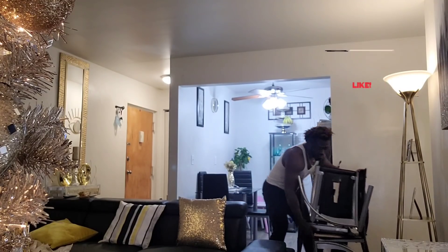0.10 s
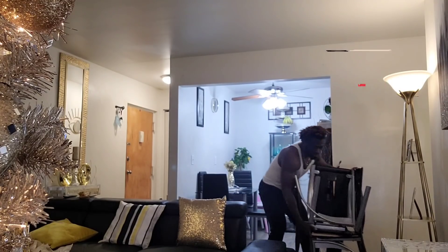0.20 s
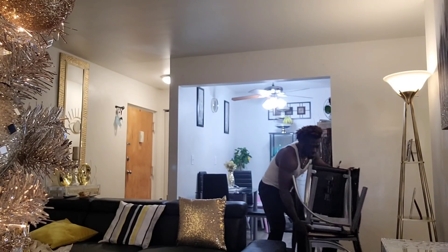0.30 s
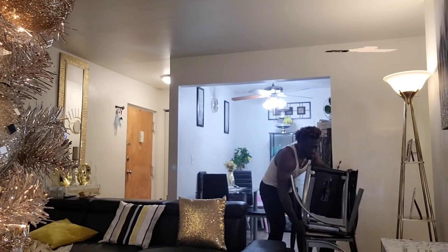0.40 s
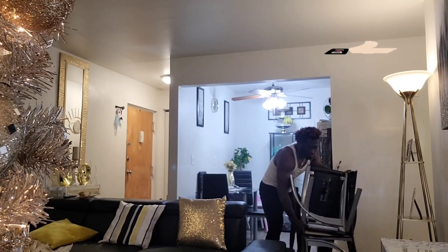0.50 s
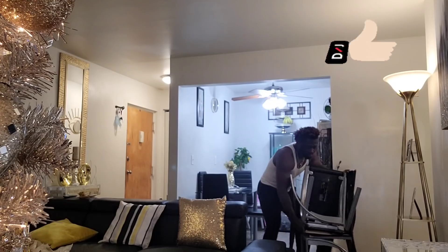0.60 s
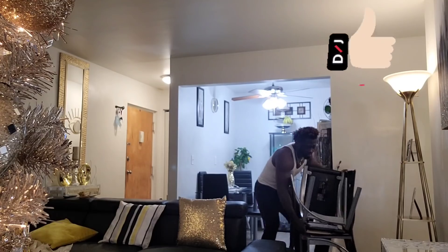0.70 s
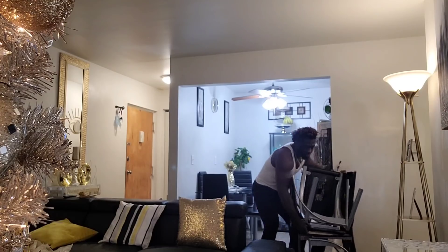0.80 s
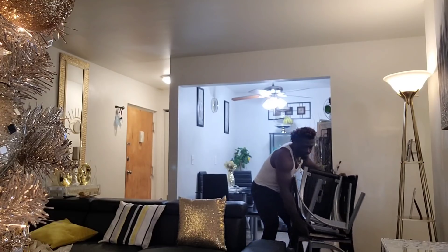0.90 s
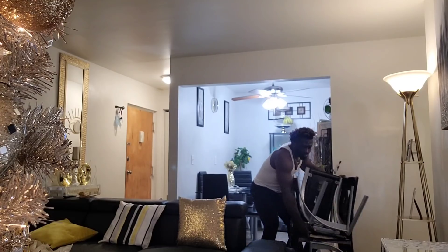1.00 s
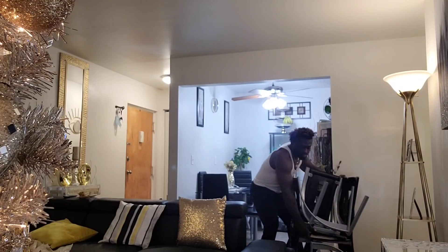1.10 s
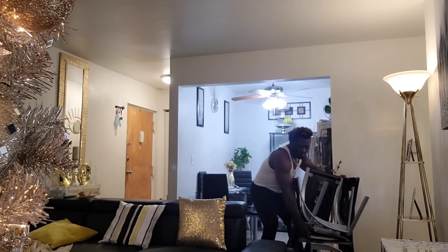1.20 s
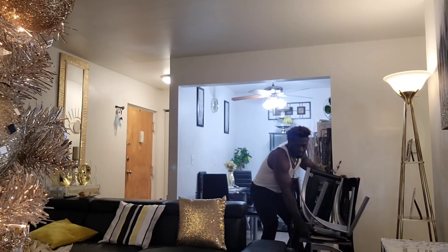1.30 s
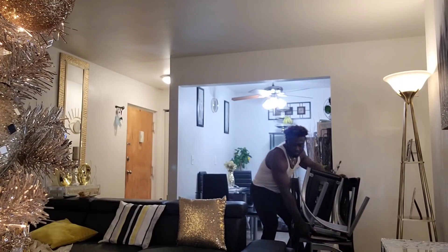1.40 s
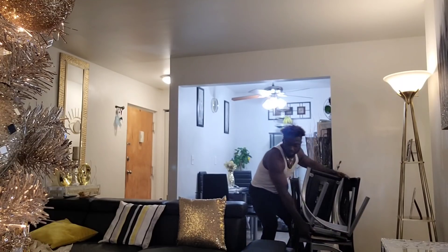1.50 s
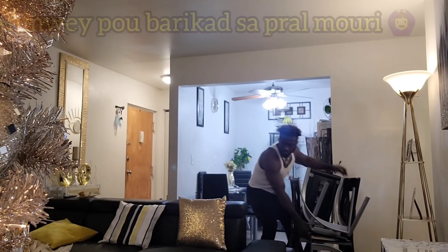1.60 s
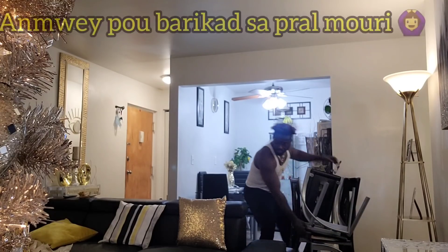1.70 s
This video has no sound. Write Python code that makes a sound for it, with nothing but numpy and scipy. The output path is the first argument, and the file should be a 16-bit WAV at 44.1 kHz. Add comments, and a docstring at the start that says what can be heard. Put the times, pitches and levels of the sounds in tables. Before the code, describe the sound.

A metal-framed chair clunks loudly onto a stack, clatters and scrapes, then settles with lighter knocks

```python
"""A metal-framed chair is settled onto a stack in a living room, a little to the right; a fan hums throughout.
After light contact it lands with a loud clunk, its tubes scrape down the frame below, it seats with a second
clunk and is nudged home with lighter knocks, and a loose tube rings on. The seats rub in between.
Knocks are decaying noise bands plus struck sine modes; scrapes are random slips through a resonator;
rubbing and air are coloured noise; the fan is wavering sines."""
import sys
import numpy as np
from scipy import signal
from scipy.io import wavfile
from scipy.ndimage import uniform_filter1d

SR = 44100
rng = np.random.default_rng(int(sys.argv[2]) if len(sys.argv) > 2 else 0)


def transcribe(u):
    """Save the signal u as a 16-bit wav file named by the first command-line argument.

    u: samples, shape (n,) or (channels, n), limited to [-1, 1]; the rate is SR.
    q: integer samples, one column per channel.
    """
    v = np.clip(np.atleast_2d(u).T, -1, 1)
    q = np.round(v * 32767).astype(np.int16)
    wavfile.write(sys.argv[1], SR, q)


N = 74970
TIME = np.arange(N) / SR
EDGES_HZ = 25 * 2 ** (np.arange(29) / 3)  # third octaves
CENTRES_HZ = np.sqrt(EDGES_HZ[1:] * EDGES_HZ[:-1])

# frame meets frame: start_s, rise_s, modes_db, favoured_mode_hz, body_db, knock_db, clack_db, clank_db, tick_db
KNOCKS = [ (0.001, 0.0017, -42.5, 214, -33.5, -43, -48, -44.5, -83),
          (0.153, 0.0038, -59, 327, -42.5, -40.5, -48, -80, -56),
          (0.228, 0.0078, -16.5, 203, -18, -23, -21.5, -19.5, -37.5),
          (0.241, 0.0029, -33.5, 406, -22.5, -23, -21, -43, -55),
          (0.395, 0.0023, -55, 250, -50, -36.5, -42, -59.5, -62.5),
          (0.409, 0.0024, -57.5, 400, -45.5, -34, -40.5, -47, -46),
          (0.420, 0.0074, -40, 403, -35, -24, -29, -32, -36),
          (0.431, 0.012, -31.5, 503, -38, -32.5, -30.5, -24.5, -61),
          (0.473, 0.0037, -24.5, 360, -24.5, -29, -28.5, -27.5, -45),
          (0.581, 0.00145, -58, 390, -84, -65, -66, -57, -60),
          (0.6794, .002, -38.5, 420, -33.5, -30, -36, -46, -51),
          (0.6908, 0.0011, -53, 400, -49, -43, -66, -46, -58),
          (0.709, 0.0031, -59, 400, -54, -71, -46, -60, -60),
          (0.774, 0.0077, -70, 400, -67, -67, -62, -51.5, -68),
          (0.8263, .001, -66, 400, -44, -63, -48.5, -47.5, -52),
          (0.857, 0.004, -45, 280, -38, -40, -48.5, -57.5, -56),
          (0.919, 0.014, -55.5, 307, -40.5, -44.5, -58, -60, -70),
          (1.031, .006, -52, 300, -48, -43, -52, -46.5, -74),
          (1.052, 0.0044, -43, 219, -34, -50, -44.5, -45.5, -76),
          (1.080, 0.0088, -40, 222, -36.5, -41, -38.5, -36.5, -46.5),
          (1.105, 0.012, -50, 402, -51, -40, -48, -46, -65),
          (1.253, 0.0045, -59.5, 300, -51.5, -53, -95, -62, -72),
          (1.563, 0.0018, -78.5, 400, -68, -81, -74.5, -74, -82),
          (1.683, 0.0029, -75.5, 400, -68, -67, -84.5, -74, -74)]


def amp(db):
    """Decibels to gain."""
    return 10 ** (np.asarray(db) / 20)


def at_hz(points, hz):
    """Read a table on a log-frequency axis."""
    table_hz, values = np.transpose(points)
    return np.interp(np.log(hz), np.log(table_hz), values)


def pan(db):
    """Left and right gains: db down on the left, db up on the right."""
    return amp([[-db], [db]])


def dying(t60_s):
    """Exponential decay from the first sample, 60 dB in t60_s."""
    return amp(-60 * TIME / t60_s)


def convolve(x, response):
    """Play a signal through a response."""
    return signal.fftconvolve(np.atleast_2d(x), response, axes=-1)[:, :N]


def drift(knots_per_s):
    """Random line through 400 knots of spread 1; holds the last one once they run out."""
    knots = rng.standard_normal(400)
    return np.interp(TIME * knots_per_s, np.arange(len(knots)), knots)


def stereo_noise(hz):
    """White noise, as alike in both channels as the room makes it at this pitch."""
    # pitch_hz, left_right_correlation
    likeness = [(60, 0.9), (170, 1), (300, 0.52), (600, .2), (1500, 0), (12000, 0.072)]
    alike = np.clip(at_hz(likeness, hz), -.99, .99)
    mid, side = rng.standard_normal((2, N))
    return np.sqrt((1 + alike) / 2) * mid + np.sqrt((1 - alike) / 2) * side * [[1], [-1]]


def band(x, index):
    """One third-octave band; unit white noise comes out at 0 dB per octave."""
    lo_hz, hi_hz = EDGES_HZ[index], EDGES_HZ[index + 1]
    sos = signal.butter(2, [lo_hz, hi_hz], "band", fs=SR, output="sos")
    return signal.sosfilt(sos, x + 1e-18) * np.sqrt(SR / 6 / (hi_hz - lo_hz))


def knock_db(hz):
    """Level of every knock at one pitch."""
    # pitch_hz of body, knock, clack, clank, tick
    knock_hz = [250, 900, 2300, 4600, 11000]
    return np.array([np.interp(np.log(hz), np.log(knock_hz), row[4:]) for row in KNOCKS])


def blows(db):
    """One impulse for each knock, halfway through its rise."""
    rows, out = np.array(KNOCKS), np.zeros(N)
    strike_s = rows[:, 0] + rows[:, 1] / 2
    out[(strike_s * SR).astype(int)] = amp(db)
    return out


def mode(hz, t60_s, lag_rad):
    """A sine that swells briefly and dies, lagging in the right channel."""
    rise_s = 0.0018
    envelope = dying(t60_s) * (1 - np.exp(-TIME / rise_s))
    return envelope * np.sin(2 * np.pi * hz * TIME - np.array([[0], [lag_rad]]))


def damped(start_s, hz, db, t60_s, rise_s):
    """One quickly dying resonance struck at start_s."""
    age_s = np.maximum(TIME - start_s, 0)
    envelope = np.interp(age_s, TIME, dying(t60_s)) * (1 - np.exp(-age_s / rise_s))
    return amp(db) * envelope * np.sin(2 * np.pi * hz * age_s)


def fan():
    """Slightly wavering fan and mains tones over a soft rush of air."""
    # tones before trim and pan: pitch_hz, level_db (rms)
    hum = [(64.6, -74), (118.4, -73), (193.8, -60), (328.4, -67), (376.8, -73.5), (495.3, -80), (1357, -80)]
    # room floor before pan: pitch_hz, level_db_per_octave
    air_floor = [(25, -91), (40, -80.5), (60, -74.5), (110, -77.5), (200, -63), (350, -58.5), (600, -67.5),
                 (1000, -70), (1400, -73), (1900, -94), (5000, -85.5), (8000, -80), (15000, -87)]
    trim_db, waver, waver_knots_per_s, pan_db = 0.5, .1, 4.2, 1.9
    tones = np.zeros(N)
    for hz, db in hum:
        level = amp(db + trim_db) * np.sqrt(2) * (1 + waver * drift(waver_knots_per_s))
        tones += level * np.sin(2 * np.pi * (hz * TIME + rng.random()))
    air = np.zeros((2, N))
    for k, hz in enumerate(CENTRES_HZ):
        air += band(stereo_noise(hz), index=k) * amp(at_hz(air_floor, hz))
    return (tones + air) * pan(pan_db)


def rubbing():
    """Grainy hiss of the seats sliding over each other: coloured noise with a flickering level."""
    # strength as the chair is handled, before colour: time_s, level_db
    rub = [(0, -45), (.12, -57), (.22, -50.5), (.38, -50.5), (.55, -49.5), (.62, -56.5), (.68, -49),
           (.76, -55.5), (.82, -60), (.88, -54.5), (.94, -63.5), (1.01, -51), (1.08, -53.5), (1.2, -67),
           (1.3, -65.5), (1.46, -78), (1.7, -87)]
    # added to the strength: pitch_hz, level_db_per_octave
    colour = [(100, -18.5), (300, -2), (1000, -2.5), (2500, -3.5), (5000, -5), (7500, -1.5), (10000, -8),
              (15000, -1.5)]
    flicker_db, flicker_knots_per_s = 1, 120
    level = amp(np.interp(TIME, *np.transpose(rub)) + flicker_db * drift(flicker_knots_per_s))
    out = np.zeros((2, N))
    for k, hz in enumerate(CENTRES_HZ):
        out += band(stereo_noise(hz) * level, index=k) * amp(at_hz(colour, hz))
    return out


def tube_rings():
    """A loose tube is left ringing, in clusters of close partials that beat."""
    # clusters: centre_hz, half_spread_hz, level_db (peak of one partial before division by root count), t60_s
    clusters = [(3470, 125, -40.5, .4), (1940, 80, -50, .25)]
    struck_s = 1.09
    places = np.linspace(-1, 1, 9)
    out = np.zeros((2, N))
    for hz, spread_hz, db, t60_s in clusters:
        decay = np.interp(TIME - struck_s, TIME, dying(t60_s), left=0)
        for place in places:
            partial_hz = hz + spread_hz * (place + .1 * rng.standard_normal())
            phase_rad = rng.uniform(0, 2 * np.pi, (2, 1))
            partial = np.sin(2 * np.pi * partial_hz * TIME + phase_rad)
            out += amp(db) * partial / np.sqrt(len(places)) * decay
    return out


def scrapes():
    """Quick slips of tube on tube drive one narrow metal resonance, which hangs in the room."""
    # slides: start_s, length_s, level_db (rms over length, before direct and tail gains), squeal_hz, width_hz
    slides = [(0.408, 0.014, -34, 7630, 439), (0.421, .019, -23.5, 4257, 298)]
    slips_per_s, direct_db, tail_db, tail_t60_s = 1400, -6, -3, 0.22
    dry = np.zeros(N)
    for start_s, length_s, db, hz, width_hz in slides:
        stroke = np.sin(np.pi * np.clip((TIME - start_s) / length_s, 0, 1)).clip(0) ** .5
        slips = (rng.random(N) < slips_per_s / SR) * rng.standard_normal(N) * stroke
        radius = np.exp(-np.pi * width_hz / SR)  # of the resonator's pole pair
        poles = [1, -2 * radius * np.cos(2 * np.pi * hz / SR), radius ** 2]
        squeal = signal.lfilter([1, 0, -1], poles, slips + 1e-18)
        dry += amp(db) * squeal * np.sqrt(length_s * SR / (np.sum(squeal ** 2) + 1e-12))
    tail = rng.standard_normal((2, N)) * dying(tail_t60_s)
    tail /= np.sqrt(np.sum(tail ** 2, axis=1, keepdims=True))
    return amp(direct_db) * dry + amp(tail_db) * convolve(dry, tail)


def floor_thuds():
    """The legs press on the floor, which answers with a few slow damped cycles."""
    # before rise and pan: start_s, pitch_hz, level_db, t60_s
    thuds = [(0.001, 58, -42.5, 0.1), (0.23, 65, -45, 0.17), (0.399, 82, -40, 0.19),
             (0.434, 71.7, -39.5, 0.26), (1.064, 80.3, -31.5, 0.166), (1.402, 56, -47.5, 0.17)]
    return sum(damped(*row, rise_s=0.01) for row in thuds) * pan(1.2)


def seat_bumps():
    """A padded seat meets the one below: the dull damped punch in the heavy clunks."""
    # before rise and pan: start_s, pitch_hz, level_db, t60_s, pan_db (up right, down left)
    bumps = [(0.2325, 233, -35, 0.18, -3), (0.4745, 281, -15, 0.053, -2.5), (0.4755, 638, -19, 0.028, 8.5),
             (0.682, 710, -21, 0.025, 10), (0.682, 288.6, -30.5, 0.059, -1)]
    return sum(damped(*row[:4], rise_s=0.0049) * pan(row[4]) for row in bumps)


def steel_modes():
    """Every knock rings the steel tubes, whose partials reach the two channels out of step."""
    # before spread and pan: pitch_hz, level_db (against the knock at that pitch)
    partials = [(1638, -19.5), (1855, -13.5), (1990, -12.5), (2186, -24.5), (2538, -15.5), (2762, -15.5),
                (3290, -19), (3460, -14), (3664, -14.5), (3727, -14.5), (3820, -19.5), (4124, -13),
                (4690, -25.5), (5561, -13.5)]
    t60_s, spread_db = .33, 3
    out = np.zeros((2, N))
    for hz, db in partials:
        struck = blows(knock_db(hz) + db + spread_db * rng.standard_normal(len(KNOCKS)))
        sign = rng.choice([-1, 1])
        out += sign * convolve(struck, mode(hz, t60_s, rng.uniform(-np.pi, np.pi)))
    return out * pan(1.2)


def seat_modes():
    """Knocks strike the modes of seat and back; the spot that is hit favours those near one pitch."""
    # before trim, fall, spread and pan: pitch_hz, level_db (against modes_db), t60_s, right_lag_rad,
    # pan_db (up right, down left)
    resonances = [(160.6, -4, .27, 0.17, 1), (213.9, 1, 0.24, -0.14, 0), (279.4, 4, 0.18, -0.9, 0),
                  (298, 5.5, .08, -0.035, 1), (308.3, 0.5, 0.21, 0.092, 4.5), (392.6, -4.5, 0.4, -2.5, -4),
                  (432.3, -2, 0.27, -0.24, 5), (500.4, -3.5, 0.13, 1.7, 4.5), (534, -4, 0.34, 1.6, 1.5),
                  (666, -4, 0.17, 0.32, 6.5), (747, -9, 0.38, -0.6, 1), (783.6, -7, 0.39, -1, 2.5),
                  (865.6, -11.5, .27, -0.25, 7), (1230, -6.5, .29, 1.8, 6)]
    trim_db, spread_db, fall_db_per_oct = 0.5, 1.0, 5
    rows, out = np.array(KNOCKS), np.zeros((2, N))
    chance = rng.standard_normal((len(rows), len(resonances)))
    for k, (hz, db, t60_s, lag_rad, pan_db) in enumerate(resonances):
        octaves_off = np.abs(np.log2(hz / rows[:, 3]))
        level_db = rows[:, 2] + db + trim_db - fall_db_per_oct * octaves_off
        struck = blows(level_db + spread_db * chance[:, k])
        out += (-1) ** k * convolve(struck, mode(hz, t60_s, lag_rad)) * pan(pan_db)
    return out


def clatter():
    """Each knock cracks and sets the dense ring of the frames going, which passes into the room's tail."""
    # crack straight from the chair: pitch_hz, level_db (against the ring)
    direct_level = [(150, -4), (350, 0), (700, -1), (1500, 4.5), (4000, -12.5), (12000, -8)]
    # pitch_hz, pan_db (up right, down left)
    direct_pan = [(150, -1), (350, 1.5), (700, 5), (1500, 1.5), (12000, 2)]
    # dense upper ring, colours crack and room too: pitch_hz, level_db
    ring_colour = [(30, -35), (70, -28.5), (110, -17), (170, -9), (300, -1.5), (600, -5.5), (1000, 0),
                   (1800, -1), (2800, -2.5), (4200, 3), (5800, -5), (7700, 2), (9500, -4), (15000, 6.5)]
    # pitch_hz, pan_db (up right, down left)
    ring_pan = [(70, 1.2), (250, 3), (600, 6.2), (1200, 1), (3000, 0.4), (12000, 1)]
    # before build-up: pitch_hz, level_db (against the first ring)
    room_level = [(70, -9.5), (250, -5.5), (1000, -11), (3000, -6), (6000, -3), (13000, -24)]
    # pitch_hz, t60_s
    room_t60 = [(70, 0.33), (250, .52), (1000, .48), (3000, 0.44), (6000, 0.17), (13000, 1)]
    direct_t60_s, ring_t60_s, room_build_s = 0.015, 0.17, 0.036
    far_db, far_t60_s = -39.5, 0.83
    grain_db, grain_knots_per_s, even_s = -1.5, 700, 0.059

    # each push grows linearly over its rise, then stops; unit sum
    pushes = np.array([np.maximum(TIME - row[0], 0) * (TIME < row[0] + row[1]) for row in KNOCKS])
    pushes /= pushes.sum(axis=1, keepdims=True) + 1e-12
    grain = amp(grain_db * drift(grain_knots_per_s))
    grain /= np.sqrt(np.mean(grain ** 2))
    far = amp(far_db) * dying(far_t60_s)
    out = np.zeros((2, N))
    for k, hz in enumerate(CENTRES_HZ):
        crack = amp(at_hz(direct_level, hz)) * dying(direct_t60_s) * pan(at_hz(direct_pan, hz))
        ring = dying(ring_t60_s) * pan(at_hz(ring_pan, hz))
        build = 1 - np.exp(-TIME / room_build_s)
        room = amp(at_hz(room_level, hz)) * dying(at_hz(room_t60, hz)) * build
        drive = amp(knock_db(hz) + at_hz(ring_colour, hz)) ** 2 @ pushes
        power = convolve(drive, crack ** 2 + ring ** 2 + room ** 2 + far ** 2)
        dense = band(stereo_noise(hz) * grain, index=k)
        # even out slow level swings; 3 bands per octave
        local_power = uniform_filter1d(np.mean(dense ** 2, axis=0), size=int(even_s * SR))
        dense /= np.sqrt(3 * local_power + 1e-9)
        out += dense * np.sqrt(np.abs(power))
    return out


def with_dips(x):
    """Narrow valleys in the spectrum, cut by notch filters."""
    # pitch_hz, q
    dips = [(132, 12), (188, 11), (474, 3.2), (1000, 27), (5250, 12)]
    for hz, q in dips:
        x = signal.lfilter(*signal.iirnotch(hz, q, fs=SR), x)
    return x


def scene():
    """The chairs and the room behind them."""
    knocks = with_dips(clatter()) + seat_modes() + steel_modes() + seat_bumps() + floor_thuds()
    return knocks + scrapes() + tube_rings() + rubbing() + fan()


def record(dry):
    """Steep elliptic low-pass."""
    cutoff_hz, ripple_db, stop_db = 15870, .1, 80
    sos = signal.ellip(12, ripple_db, stop_db, cutoff_hz, fs=SR, output="sos")
    return signal.sosfilt(sos, dry)


dry = scene()
out = record(dry)
transcribe(out)
```